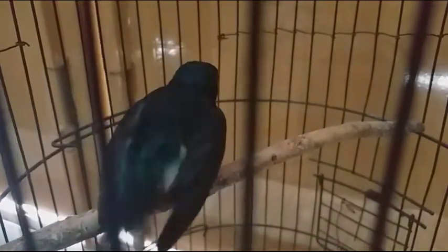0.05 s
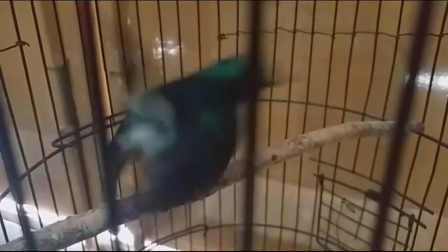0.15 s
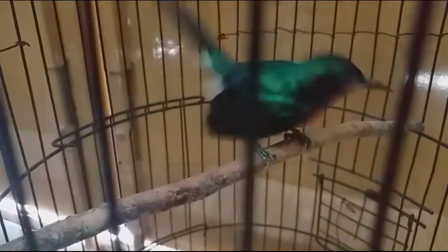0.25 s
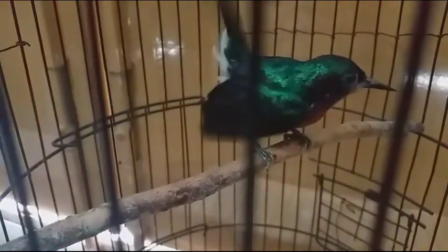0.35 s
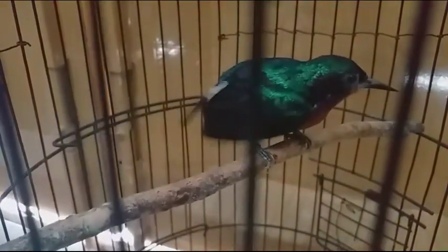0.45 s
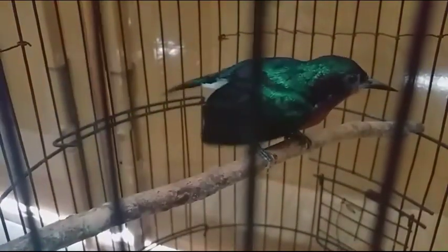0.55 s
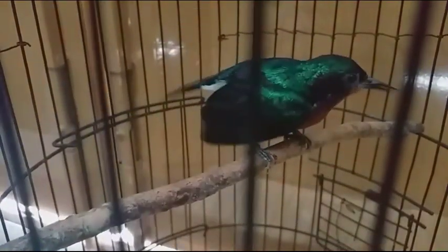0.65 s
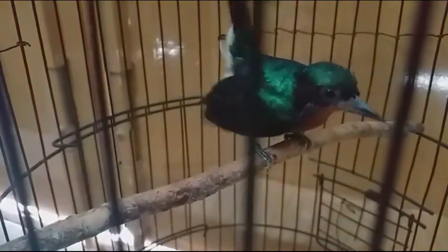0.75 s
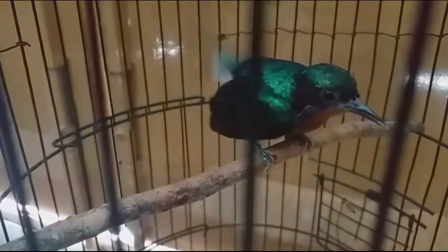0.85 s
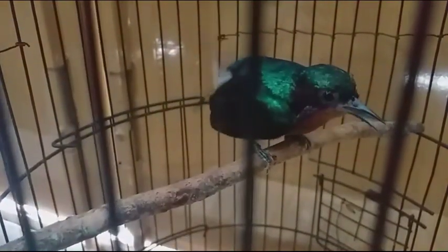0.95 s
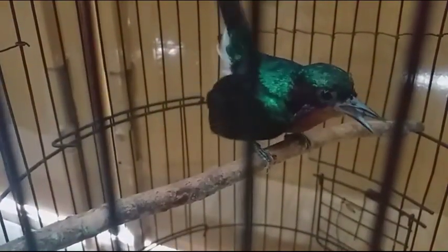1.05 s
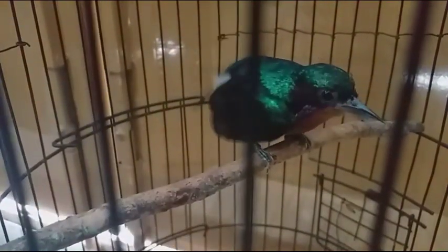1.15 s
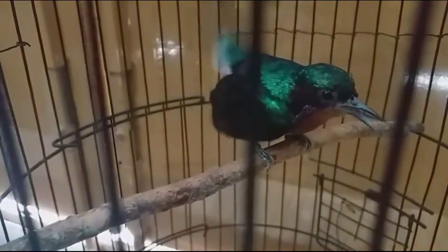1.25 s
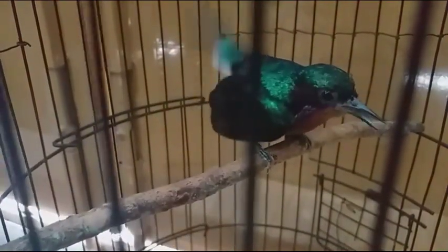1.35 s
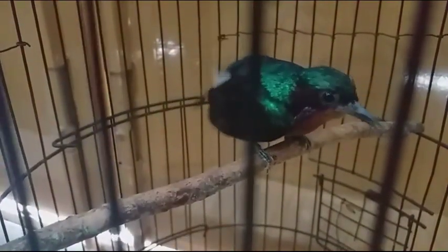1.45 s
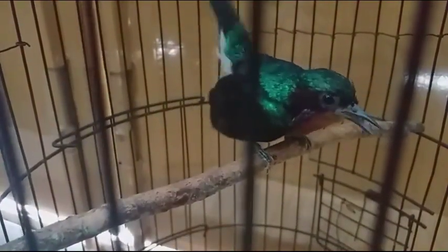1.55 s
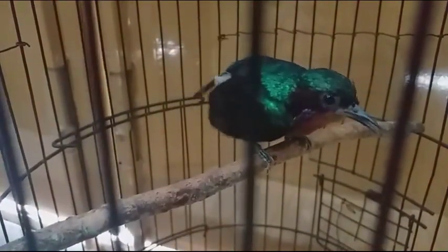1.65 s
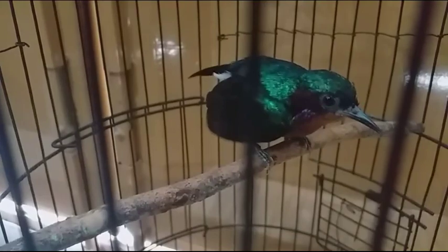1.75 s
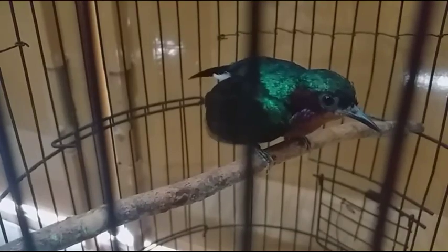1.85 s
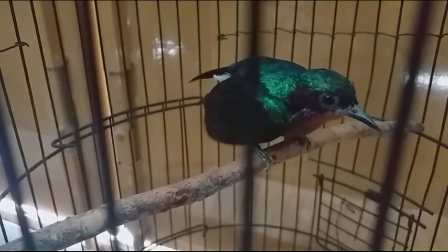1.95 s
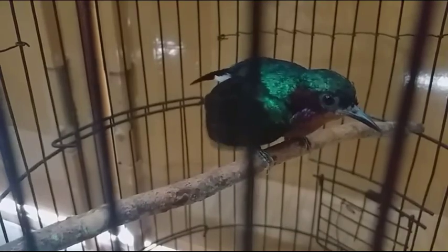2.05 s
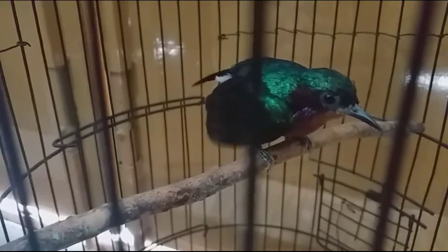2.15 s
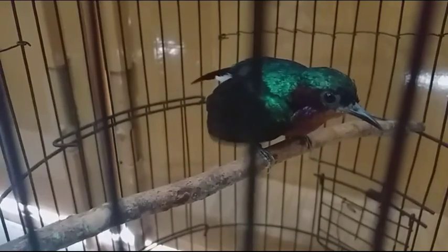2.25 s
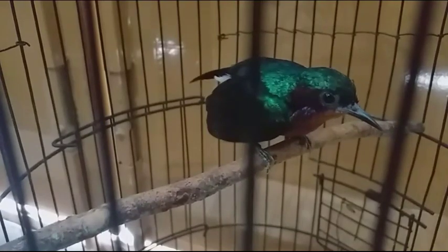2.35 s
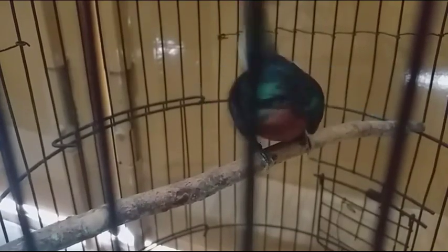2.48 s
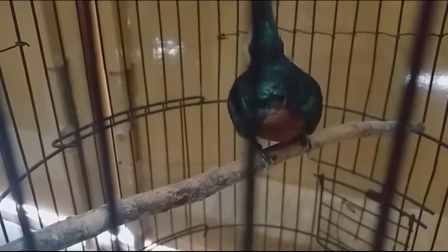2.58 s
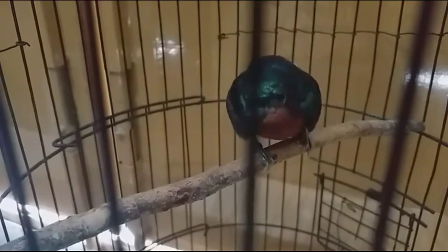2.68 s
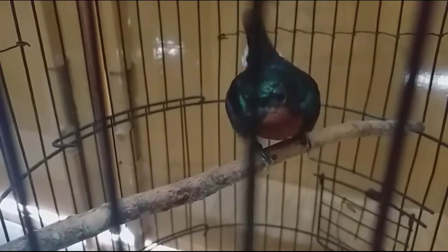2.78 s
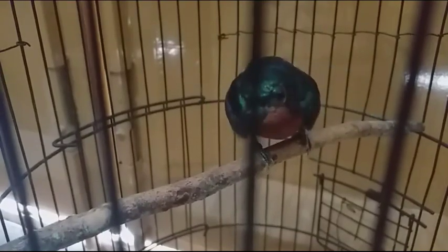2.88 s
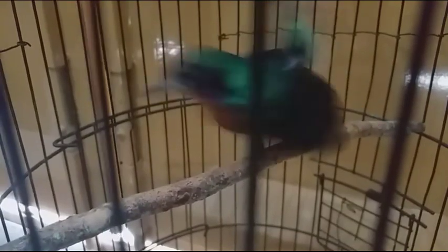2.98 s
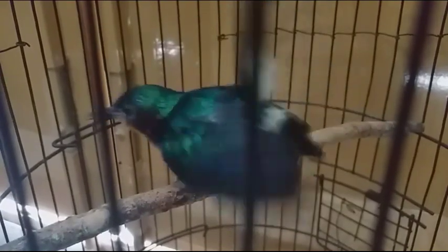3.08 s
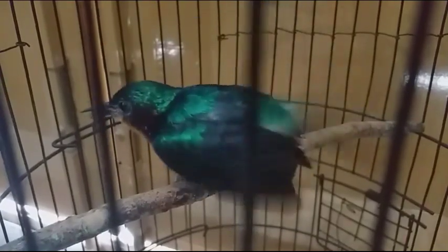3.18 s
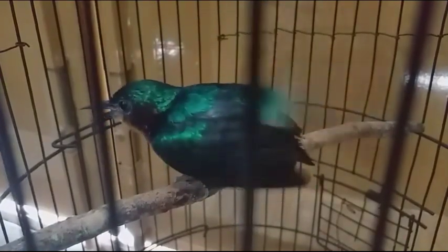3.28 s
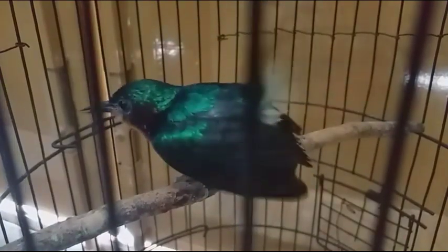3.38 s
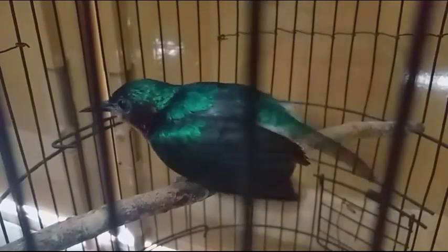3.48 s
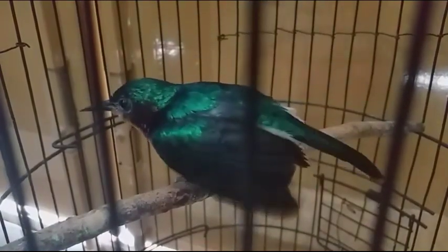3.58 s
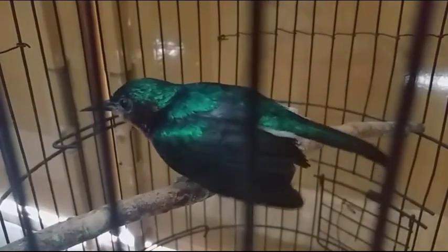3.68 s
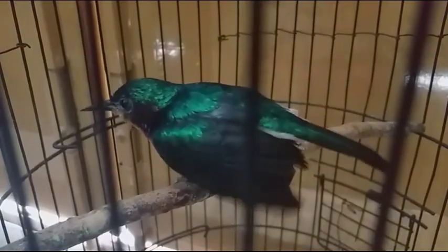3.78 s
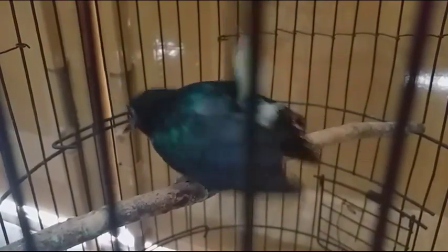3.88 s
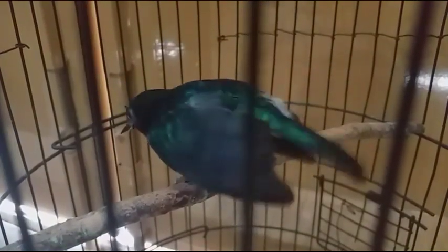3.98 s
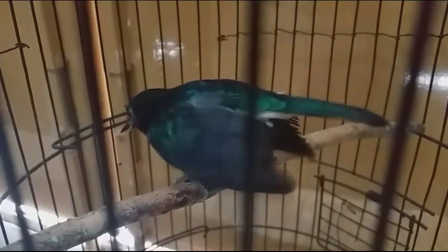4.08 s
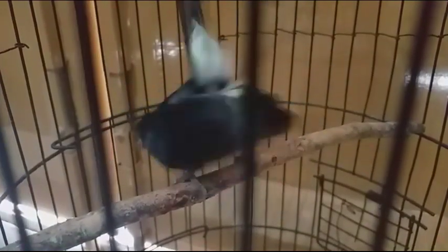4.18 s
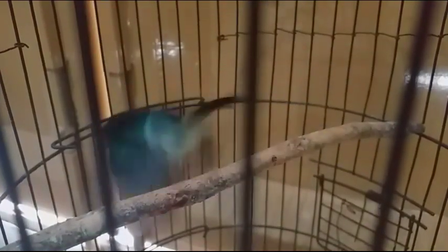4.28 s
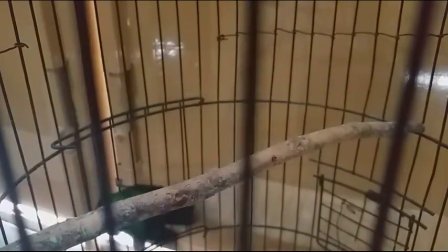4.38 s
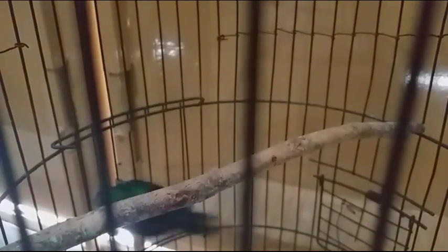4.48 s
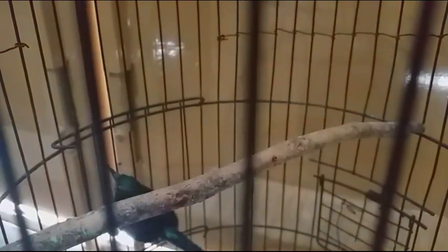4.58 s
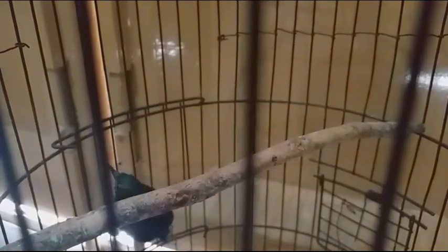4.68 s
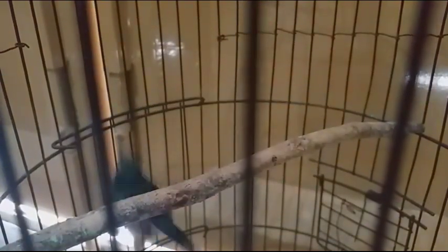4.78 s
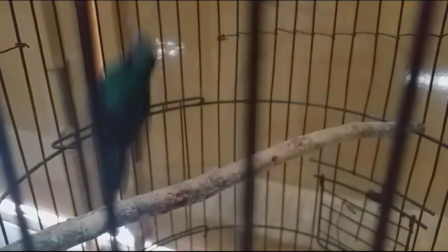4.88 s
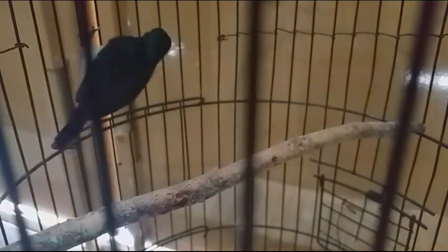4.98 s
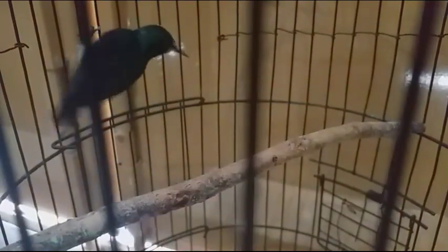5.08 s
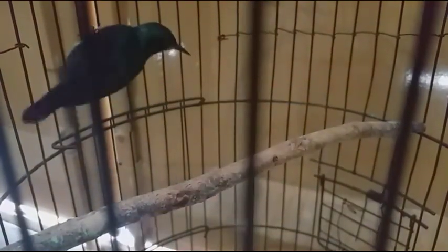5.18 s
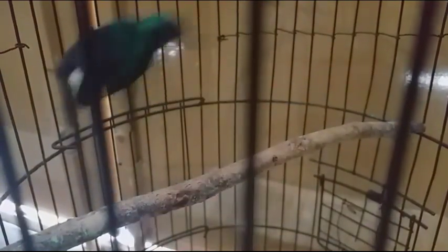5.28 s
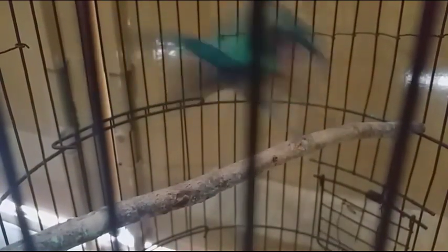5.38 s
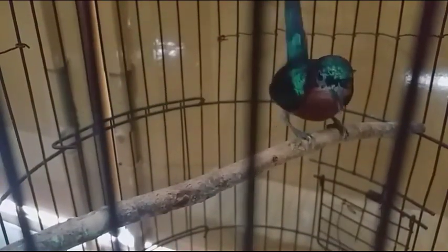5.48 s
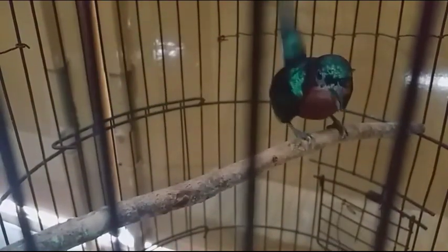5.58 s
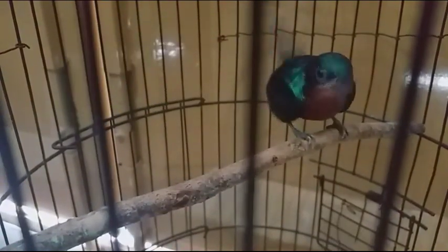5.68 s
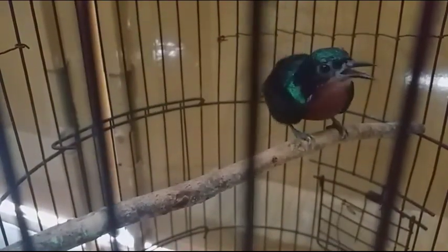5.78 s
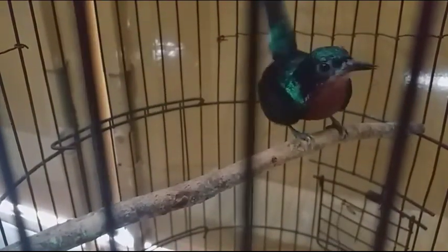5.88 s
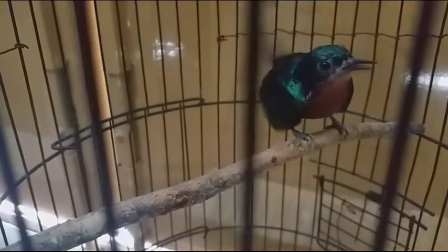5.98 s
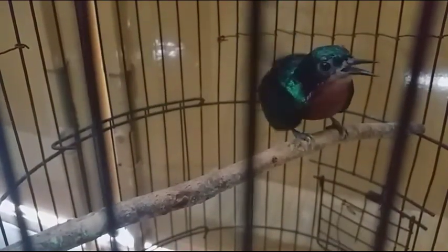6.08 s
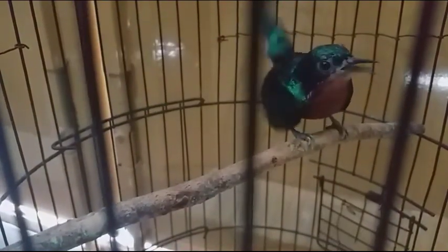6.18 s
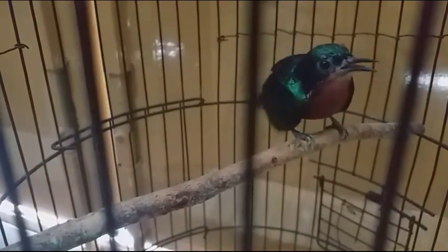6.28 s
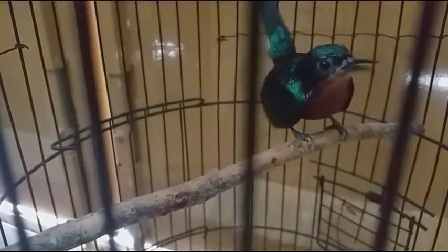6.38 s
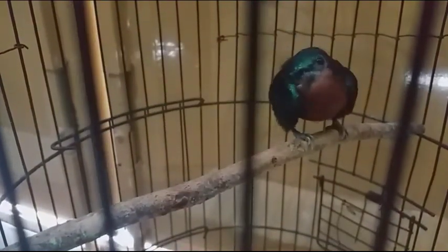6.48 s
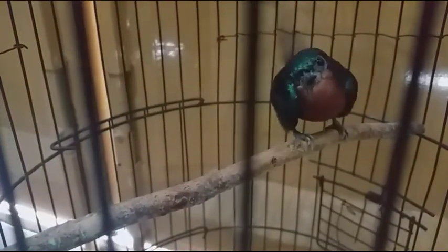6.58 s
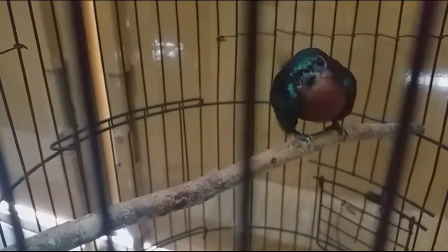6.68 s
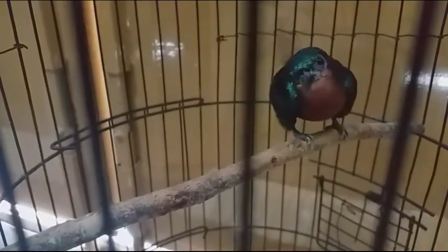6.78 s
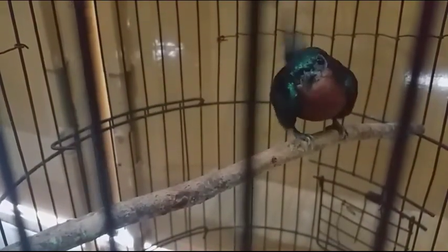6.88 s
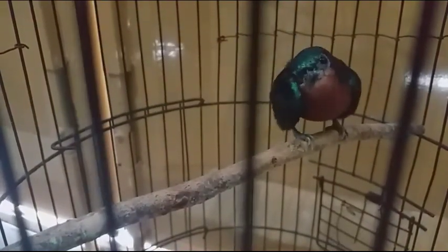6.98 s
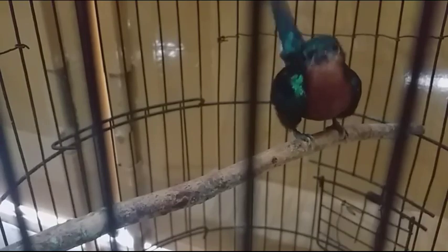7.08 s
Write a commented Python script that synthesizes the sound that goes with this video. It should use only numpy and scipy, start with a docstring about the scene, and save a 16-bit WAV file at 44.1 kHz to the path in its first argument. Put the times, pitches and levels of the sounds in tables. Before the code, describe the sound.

Three bursts of sharp chips and high, falling whistles from a nearby caged bird ring around a room, with one short flutter and rattle.

```python
"""A caged sunbird sings close by in a hard, ringing room; its breath shakes a tiny membrane in its throat.
First one whistle dies away. A thin rising call opens a run of harsh chips, then come falling whistles.
A rooster and another songbird answer faintly from far off, and the sunbird sings a second, short run.
Next it flutters and lands on the wires, calling once, while the far birds are heard again.
Last, a third run of chips leads into a long string of whistles that step lower and lower."""
import sys
import numpy as np
from scipy import signal
from scipy.fft import rfft, irfft
from scipy.io import wavfile
from scipy.ndimage import uniform_filter1d, minimum_filter1d, map_coordinates

SR = 44100
rng = np.random.default_rng(int(sys.argv[2]) if len(sys.argv) > 2 else 0)


def generate_wav(signal):
    """Clip the signal to [-1, 1] and save it as 16-bit WAV at the path in sys.argv[1]."""
    frames = np.transpose(np.atleast_2d(signal))
    scaled = np.clip(frames, -1, 1) * 32767
    pcm = np.round(scaled).astype(np.int16)
    wavfile.write(sys.argv[1], SR, pcm)


N = 314874
TIME = np.arange(N) / SR
STEP_S = .001  # time between the points that outline a whistle


# the lone wavy whistle at the very start: t/s, f/Hz, level/dB
FIRST_WHISTLE = [(0.002, 6509, -4.5), (0.008, 6557, -9.5), (0.022, 6410, -16.5), (0.034, 6618, -5.5),
                 (0.05, 7186, -10.5), (0.07, 7052, -10.5)]
def sunbird():
    """The singer's two voices: rough for the rising notes, pure for the whistles."""
    rough = syrinx(rising_calls() + chips(), split=.988, jitter=.007, rasp=.36, third_db=-37, flicker_db=4)
    whistles = [FIRST_WHISTLE] + falls() + scoops()
    return rough, syrinx(whistles, split=0, jitter=0, rasp=0, third_db=-41.5, flicker_db=5)


# harsh chips, in runs that speed up: t/s, linger/s, rise/s, top f/Hz, start level/dB, level/dB
CHIPS = [(.867, 0.0022, 0.015, 7530, -41, -10.5), (0.96, .006, 0.013, 6862, -41, -12),
         (1.031, .015, .014, 7588, -40, -13), (3.091, 0.0069, .016, 7143, -29, -8),
         (3.197, 0.0054, .013, 7163, -23, -8.5), (3.281, 0.0056, .012, 7880, -24, -10),
         (3.344, .008, .014, 6650, -23, -10.5), (5.547, 0.007, 0.014, 7370, -26.5, -9),
         (5.648, 0.0023, 0.013, 7833, -31, -9), (5.727, .006, .015, 7102, -26.5, -9),
         (5.787, .005, .016, 6650, -25, -7.5)]
# the wavy whistle that ends a run, one list a run: t/s, f/Hz, level/dB
SLURS = [
    [(1.079, 7366, -10), (1.101, 6555, -9), (1.123, 6569, -3), (1.135, 6568, -6), (1.159, 5953, -2),
     (1.169, 5890, -13), (1.187, 5784, -11), (1.207, 6169, -17.5)],
    [(3.385, 6683, -10), (3.393, 5810, -10), (3.399, 5580, -7.5), (3.427, 7144, -8), (3.437, 7433, -5.5),
     (3.458, 6987, -11.5)],
    [(5.831, 6080, -8), (5.841, 4155, -15.5), (5.848, 3967, -20), (5.857, 4681, -10.5), (5.868, 6020, -8),
     (5.877, 6820, -8), (5.89, 7159, -10), (5.907, 7297, -5), (5.914, 6863, -17.5)],
]
def chips(start_hz=2478.2, ledge_hz=4200, leap_hz=4933, climb_s=.014):
    """Each chip climbs to a ledge, lingers, then leaps up; the last of a run slides into a whistle."""
    notes = []
    for s, linger_s, rise_s, top_hz, start_db, db in CHIPS:
        ledge = s + climb_s
        leap = ledge + linger_s
        note = [(s, start_hz, start_db),
                ((s + ledge) / 2, (start_hz + ledge_hz) / 2, (start_db + db) / 2),
                (ledge, ledge_hz, db + 1.5),
                (leap, leap_hz, db - 5),
                (leap + rise_s / 2, leap_hz + .7 * (top_hz - leap_hz), db),
                (leap + rise_s, top_hz, db - 6.5)]
        tail = [tuple(point) for slur in SLURS if s < slur[0][0] < leap + 2 * rise_s for point in slur]
        notes.append(note + tail)
    return notes


# thin rising calls: t/s, rise/s, hook/s, start f/Hz, middle f/Hz, top f/Hz, level/dB
RISING_CALLS = [(0.751, 0.019, .013, 4650, 6452, 7407, -14.5), (2.983, .018, 0.017, 4740, 6304, 7263, -10),
                (4.882, 0.025, 0.015, 4594, 6086, 7654, -7), (5.425, .026, .006, 4450, 5792, 7239, -9.5)]
def rising_calls(droop_hz=300):
    """Each call sweeps upward, grows louder and hooks over at the top."""
    return [[(s, start_hz, db - 18),
             (s + rise_s / 2, middle_hz, db - 3.5),
             (s + rise_s, top_hz, db),
             (s + rise_s + hook_s, top_hz - droop_hz, db - 14.5)]
            for s, rise_s, hook_s, start_hz, middle_hz, top_hz, db in RISING_CALLS]


# falling whistles: t/s, hold/s, slide/s, rest/s, top f/Hz, foot f/Hz, end f/Hz,
# top level/dB, slide level/dB, foot level/dB, end level/dB
FALLS = [(1.418, .012, .032, 0.005, 7240, 5883, 5898, -9, -10, -8.5, -14),
         (1.583, .018, .028, .031, 6855, 5251, 5065, -13, -12, -9, -9),
         (6.136, .012, .044, .022, 7633, 6043, 5710, -14.5, -7.5, -2, -9),
         (6.342, .040, .022, 0.041, 6521, 5171, 5082, -9.5, -12, -7.5, -3.5),
         (6.599, .034, .022, 0.054, 6239, 4918, 4875, -11, -18.5, -11, -8.5),
         (6.833, .007, .053, .066, 6527, 4328, 4739, -9, -17.5, -17, -9),
         (7.1, .023, 0.019, 0.007, 5475, 4778, 4840, -10.5, -16.5, -15.5, -17.5)]
def falls(overshoot_hz=297, settle_s=.01803, wobble_hz=34, tremor_hz=38, drop_hz=131):
    """Each whistle starts a bit high, wobbles into place, slides down and rests on a lower note."""
    notes = []
    for s, hold_s, slide_s, rest_s, top_hz, foot_hz, end_hz, *levels_db in FALLS:
        corners = np.cumsum([hold_s, slide_s, rest_s])
        t = np.arange(0, corners[-1], STEP_S)
        slide = uniform_filter1d(np.interp(t, corners, [top_hz, foot_hz, end_hz]), size=9)
        settling = overshoot_hz * np.exp(-t / settle_s) * np.cos(2 * np.pi * wobble_hz * (t - .00397))
        tremor = tremor_hz * wander(65, SR)[(t * SR).astype(int)]
        drop = drop_hz * np.exp((t - t[-1]) / .004)  # the pitch sags as the breath stops pushing
        db = np.interp(t, np.cumsum([hold_s, slide_s / 2, slide_s / 2, rest_s]), levels_db)
        db += fade_db(t, attack_s=.0045, release_s=.00564)
        notes.append(list(zip(s + t, slide + settling + tremor - drop, db)))
    return notes


# short curved notes between the falls: t/s, length/s, turn/s, start f/Hz, turn f/Hz, end f/Hz, level/dB
SCOOPS = [(1.25, .043, 0.017, 7350, 6645, 6920, -6), (1.328, .028, .016, 7377, 7600, 7620, -6),
          (1.476, .037, .020, 6500, 6304, 6666, -4), (1.707, 0.027, 0.005, 5995, 6012, 6420, -5),
          (6.026, 0.02402, 0.02093, 8203, 7180, 7180, -4.5),
          (6.056, 0.01818, 0.0087, 6960, 7250, 7200, -1.5), (6.243, .024, 0.023, 8300, 6859, 6900, -1.5),
          (6.485, 0.03, .026, 8078, 6900, 6900, -5.5), (6.741, 0.032, .015, 7434, 6185, 6985, -4.5),
          (6.992, .037, .016, 6485, 5680, 5938, -8)]
def scoops(flat_hz=345):
    """Each short whistle eases into its turning pitch and curves away again."""
    notes = []
    for s, length_s, turn_s, start_hz, turn_hz, end_hz, db in SCOOPS:
        t = np.arange(0, length_s, STEP_S)
        away = np.interp(t, [0, turn_s, max(length_s, turn_s + STEP_S)], [1, 0, 1]) ** 2
        hz = turn_hz + away * (np.where(t < turn_s, start_hz, end_hz) - turn_hz)
        hz -= flat_hz * np.exp(-t / .004)  # a little low until the breath builds up
        notes.append(list(zip(s + t, hz, db + fade_db(t, attack_s=.009, release_s=.014))))
    return notes


# how strongly each pitch of the voice comes through: the throat and beak favour 6-7.5 kHz, and the sound dips
# near 9 kHz: f/Hz, level/dB
BEAK = [(1200, -60.5), (2500, -29), (3500, -23.5), (4500, -9.5), (6000, 1.5), (7400, 3), (8200, -10.5),
        (9300, -27.5), (12000, -10.5), (15000, 1.5)]
# air rushing through the open beak in a chip: f/Hz, level/dB
BEAK_HISS = [(1000, -27.5), (2200, -27), (3500, -14.5), (5000, -3.5), (7600, 7), (9200, -23.5),
             (12000, -16.5), (15000, -12.5)]
# air leaking past the membrane: f/Hz, level/dB
AIR_LEAK = [(3000, -39), (5000, -12), (7600, -5.5), (9200, -26.5), (11000, -12), (12500, -1), (15000, -0.5)]
def syrinx(notes, split, jitter, rasp, third_db, flicker_db, split_s=.0517, throb_db=1, stutter_db=3):
    """The bird's voice box. With split, a note starts rough: its wave repeats only every second swing."""
    out = np.zeros(N)
    for note in notes:
        start, hz, gain = trace_note(note)
        size = len(hz)
        gain = gain * undb(throb_db * wander(130, size))
        rough = split * np.exp(-(np.arange(size) / SR / split_s) ** 2)
        hz = hz * (1 + (.0018 + jitter * rough) * wander(900, size))
        phase = 2 * np.pi * np.cumsum(hz) / SR
        # a slack membrane slaps shut, adding extra tones and hiss; a tight one is almost pure
        slack = rough * np.clip((4300 / hz) ** 5, 0, 1.5)
        octave = undb(-25 + flicker_db * wander(170, size)) * (1 + .4 * wander(1100, size))
        # the tones in the voice, as multiple of the pitch: strength
        tones = {.5: .2 * slack, 1: 1, 1.5: 1.143 * slack, 2: octave + .23 * slack,
                 2.5: .14 * slack, 3: undb(third_db) + .028 * slack}
        voice, power = 0, 0
        for k, strength in tones.items():
            stutter = stutter_db * rough * wander(346, size)  # each tone shakes on its own
            in_range = np.clip((SR / 2 - k * hz) / 2000, 0, 1)  # fade out tones too high to play
            weight = strength * undb(lookup(BEAK, k * hz) + stutter) * in_range
            voice += weight * np.sin(k * phase)
            power += weight ** 2 / 2
        hiss = undb(-14) * np.sqrt(slack) * noise(BEAK_HISS, size)
        leak = undb(-46) * noise(AIR_LEAK, size)
        shake = 1 + (.012 + rasp * np.sqrt(rough)) * wander(970, size)
        add(out, start, gain * (voice / np.sqrt(power) * shake + hiss + leak))
    return out


# sharp snaps in the song: t/s, level/dB
SNAPS = [(0.034, -31.5), (1.144, -35), (1.158, -38), (1.278, -31), (1.344, -36), (1.49, -31),
         (3.433, -27.5), (3.448, -32), (5.669, -37), (5.894, -33.5), (6.039, -35.5), (6.254, -24),
         (6.495, -31.5), (6.753, -35.5)]
# the tone of a snap: f/Hz, level/dB
SNAP_COLOUR = [(40, -8), (200, 9.5), (700, 0.5), (1800, -7), (4000, -1.5), (8000, -12.5), (9500, -23.5),
               (12000, 5.5), (15000, -6)]
def snaps(length_s=.003):
    """Tiny bursts of noise, placed on the loudest peaks of the song."""
    return noise(SNAP_COLOUR) * sum(undb(db) * np.exp(-((TIME - s) / length_s) ** 2) for s, db in SNAPS)


# feet and wings hitting the cage: t/s, level/dB, time to fade by 60 dB/s
KNOCKS = [(2.204, -59.5, 0.055), (4.342, -50.5, 0.073), (4.391, -51.5, .04), (4.449, -46.5, 0.15),
          (4.537, -35, 0.0918), (4.701, -48.5, 0.39), (4.906, -25.5, 0.076), (5.101, -44.5, 0.03)]
# the tone of the wires: f/Hz, level/dB
CAGE_COLOUR = [(200, -39), (700, -2.5), (1600, -1.5), (4000, 5), (7000, 4.5), (9000, -11.5), (15000, -18)]
def cage(attack_s=.00475):
    """Each knock on the wires gives a short, dry rattle."""
    blows = sum(undb(db - 60 * np.maximum(TIME - s, 0) / ring_s) * np.clip((TIME - s) / attack_s, 0, 1)
                for s, db, ring_s in KNOCKS)
    return blows * noise(CAGE_COLOUR)


# bursts of flapping: middle t/s, half length/s, level/dB
FLUTTERS = [(3.045, 0.09, -53), (4.55, 0.26, -74.5), (4.94, 0.097, -66.5)]
# the tone of the air the wings push: f/Hz, level/dB
WING_COLOUR = [(60, 4), (200, -6), (550, -4), (900, -7.5), (1600, -30), (6000, -25.5)]
def wings(beat_hz=24):
    """Soft rushes of air that pulse a little with each wing beat."""
    effort = sum(undb(db) * np.exp(-((TIME - s) / half) ** 2) for s, half, db in FLUTTERS)
    return effort * (1 + .067 * np.sin(2 * np.pi * beat_hz * TIME)) * noise(WING_COLOUR)


# first echoes, from the cage floor and the wall behind: delay t/s, level/dB
FIRST_ECHOES = [(.0031, -15.5), (.0057, -15.5), (.0083, -17.5), (0.013, -24.5)]
def near_walls(x):
    """Quick echoes overlap a sliding note and make it throb."""
    return x + sum(undb(db) * np.pad(x, (int(lag * SR), 0))[:N] for lag, db in FIRST_ECHOES)


# the tone of the room's echo: f/Hz, level/dB
ROOM_COLOUR = [(300, -4.5), (2500, -5), (4500, -10.5), (7400, -9.5), (8400, -14), (11000, -6.5),
               (15000, -5.5)]
# how long the room rings: f/Hz, time to fade by 60 dB/s
ROOM_RING = [(300, 1), (4000, 1.057), (6000, 1.149), (7500, 0.925), (10000, 0.8217), (15000, 0.35)]
def room(x, build_s=.002):
    """Countless echoes off bare walls blur together; the highest sounds die first."""
    f, t, grains = signal.stft(rng.standard_normal(2 * SR), SR, nperseg=256)
    decay = undb(lookup(ROOM_COLOUR, f)[:, None] - 60 * t / lookup(ROOM_RING, f)[:, None])
    ring = signal.istft(grains * decay * (1 - np.exp(-t / build_s)), SR)[1]
    # the echo's strength is set in the range where the sunbird sings
    song_band = signal.sosfilt(signal.butter(2, [4500, 7500], "band", fs=SR, output="sos"), ring)
    return signal.fftconvolve(x, ring / np.sqrt(np.sum(song_band ** 2) * SR / 6000))[:N]


# the tone of the echo heard at the start: f/Hz, level/dB
OPENING_ECHO = [(1500, -51), (3000, -34.5), (4200, -14.5), (5500, -1.5), (7200, 0.5), (8600, -34.5),
                (11000, -45.5), (14000, -30), (16000, -44)]
def opening_echo(ring_s=1.055):
    """The room still rings from the phrase that is just ending."""
    return noise(OPENING_ECHO) * undb(-22 - 60 * TIME / ring_s)


# a songbird elsewhere in the house, one list a call: t/s, f/Hz, level/dB
SONGBIRD_CALLS = [
    [(2.55, 5450, -70.5), (2.68, 4160, -56), (2.78, 4200, -61.5), (2.84, 3587, -65.5), (2.98, 4042, -57)],
    [(3.92, 5714, -47.5), (4.08, 4820, -52.5), (4.16, 4220, -92), (4.3, 5106, -51.5), (4.44, 4600, -56),
     (4.52, 4200, -54.5), (4.7, 3990, -55), (4.8, 4397, -50), (4.95, 4430, -45.5)],
]
def far_songbird():
    """A faint whistle whose pitch warbles fast and wide."""
    return far_calls(SONGBIRD_CALLS, waver=.1, waver_rate=100, overtones=[])


# a rooster far away: t/s, length/s, top f/Hz, level/dB
CROWS = [(1.809, 0.63, 678.2, -69), (4.63, 0.52, 668.6, -56)]
# the rise and fall of every crow: share of its length, share of its top pitch, level/dB
CROW_ARCH = [(0, .94, 2), (0.118, 1, -2), (.4, 1, -6), (.64, 0.964, 0), (.8, .93, -8), (1, 0.77, -25.5)]
# the rasp in the rooster's throat: f/Hz, level/dB
CROW_RASP = [(400, -31), (650, -1), (850, -2.5), (1050, -2), (1300, -16), (1800, -29)]
def rooster(hoarse=.371, rasp_db=-7):
    """A hoarse crow: the voice shakes in loudness and carries a rasp of throat noise."""
    crows = [[(s + at * length, top_hz * share, db + arch_db) for at, share, arch_db in CROW_ARCH]
             for s, length, top_hz, db in CROWS]
    voice = far_calls(crows, waver=.016, waver_rate=60, overtones=[(1.5, -20), (2, -25)])
    loudness = np.abs(signal.hilbert(voice)) / np.sqrt(2)
    return voice * (1 + hoarse * wander(260, N)) + undb(rasp_db) * loudness * noise(CROW_RASP)


def far_calls(calls, waver, waver_rate, overtones):
    """A far bird's tone, wavering by a share of its pitch; overtones list multiple, level/dB."""
    out = np.zeros(N)
    for call in calls:
        start, hz, gain = trace_note(call, edge_s=.035)
        phase = 2 * np.pi * np.cumsum(hz * (1 + waver * wander(waver_rate, len(hz)))) / SR
        tone = np.sin(phase) + sum(undb(db) * np.sin(k * phase) for k, db in overtones)
        add(out, start, np.sqrt(2) * gain * tone)
    return out


# the tone of the house's background noise: f/Hz, level/dB
HOUSE_COLOUR = [(25, -36), (60, -27), (115, -6), (200, -18), (400, -34), (1000, -39), (1800, -44),
                (4500, -17), (7000, -26), (9000, -46), (15000, -55)]
# its slow rise and fall: t/s, level/dB
HOUSE_LEVEL = [(0, -60.5), (1.8, -57.5), (2.5, -65), (2.9, -60.5), (3.8, -61), (4.3, -59), (5.3, -55.5),
               (7.1, -58)]
def house_noise(swell_db=1.5):
    """A quiet rumble and hiss that swells a little."""
    level_db = np.interp(TIME, *np.transpose(HOUSE_LEVEL))
    return noise(HOUSE_COLOUR) * undb(level_db + swell_db * wander(3.93, N))


def trace_note(note, edge_s=.003):
    """Join a note's points smoothly; gives its start time, pitch curve and loudness curve."""
    s, hz, db = np.transpose(sorted(note))
    t = np.arange(s[0] - edge_s / 2, s[-1] + edge_s / 2, 1 / SR)
    fade = np.sin(np.pi / 2 * np.clip(np.minimum(t - t[0], t[-1] - t) / edge_s, 0, 1)) ** 2
    pitch = uniform_filter1d(np.interp(t, s, hz), size=90)
    loudness = uniform_filter1d(np.interp(t, s, undb(db)), size=60)
    return t[0], pitch, fade * loudness


def fade_db(t, attack_s, release_s):
    """Fade a note in, hold it and fade it out, in dB."""
    ramp = np.minimum((t + STEP_S) / attack_s, (t[-1] - t + STEP_S) / release_s)
    return 20 * np.log10(np.clip(ramp, 1e-3, 1))


def undb(db):
    """Turn decibels into a number to multiply by."""
    return 10 ** (np.asarray(db) / 20)


def lookup(table, hz):
    """Read between the rows of an f/Hz, value table, with octaves evenly spaced."""
    f, value = np.transpose(table)
    return np.interp(np.log(np.maximum(hz, 1)), np.log(f), value)


def colour(x, spectrum):
    """Turn a sound's lows and highs up or down by an f/Hz, level/dB table."""
    return irfft(rfft(x) * undb(lookup(spectrum, np.fft.rfftfreq(len(x), 1 / SR))), len(x))


def noise(spectrum, size=N):
    """Noise of strength 1 with the given tone."""
    y = colour(rng.standard_normal(size), spectrum)
    return y / y.std()


def wander(rate, size):
    """A smooth random wiggle, about 1 in size, that changes rate times a second."""
    at = np.arange(size) * rate / SR
    return map_coordinates(rng.standard_normal(int(at[-1]) + 2), [at], order=3, mode="nearest")


def add(out, start, sound):
    """Mix a sound in from its start time."""
    i = max(int(start * SR), 0)
    out[i:i + len(sound)] += sound[:max(N - i, 0)]


def scene():
    """The singer and its cage are close; the other birds arrive only as echo."""
    rough, pure = sunbird()
    movement = cage() + wings()
    far_birds = far_songbird() + rooster()
    echo = room(undb(-10.5) * rough + undb(-11.5) * pure + undb(-4) * movement + far_birds)
    return (near_walls(rough + pure) + movement + echo + opening_echo() + house_noise() + snaps())[None]


# soft thumps where loud notes throb against their echoes in the microphone: f/Hz, level/dB
THUMP_COLOUR = [(20, -33.5), (70, 0.5), (150, 0), (500, -0.5), (1500, -2), (3000, -3), (6000, -46.5)]
def record(dry, ceiling=.92, thump_db=-31, top_hz=15600):
    """A limiter turns peaks down, the lopsided microphone adds thumps, and the very top is cut."""
    peak = np.abs(signal.hilbert(dry[0]))
    allowed = np.minimum(1, ceiling / (peak + 1e-9))
    gain = uniform_filter1d(minimum_filter1d(allowed, size=65), size=65)
    thumps = undb(thump_db) * colour((peak * gain) ** 2, THUMP_COLOUR)
    top_cut = signal.ellip(10, .2, 80, top_hz, fs=SR, output="sos")
    return signal.sosfilt(top_cut, dry * gain + thumps)


dry = scene()
out = record(dry)
generate_wav(out)
```